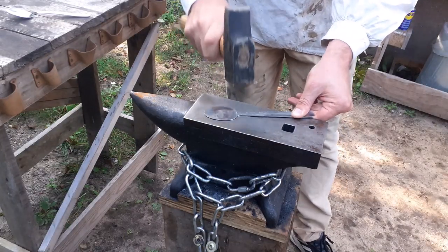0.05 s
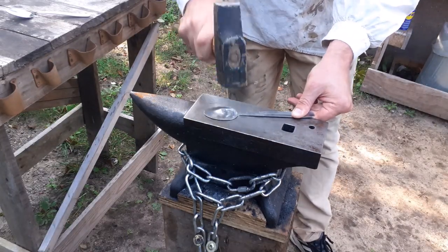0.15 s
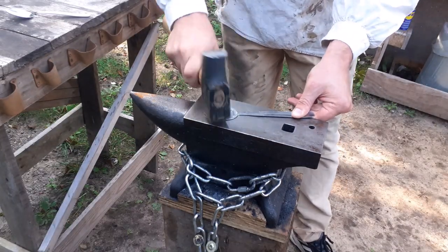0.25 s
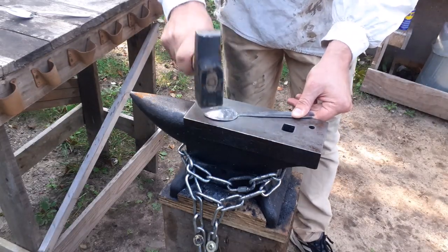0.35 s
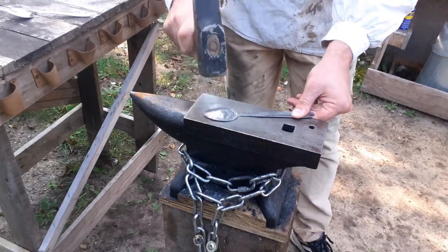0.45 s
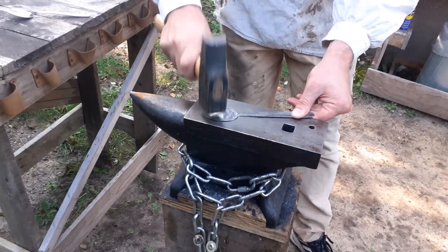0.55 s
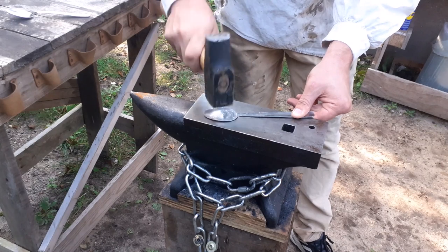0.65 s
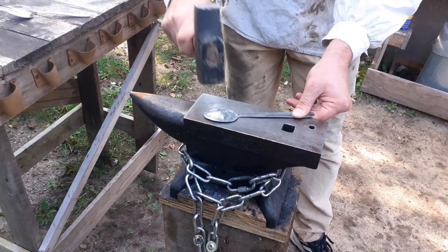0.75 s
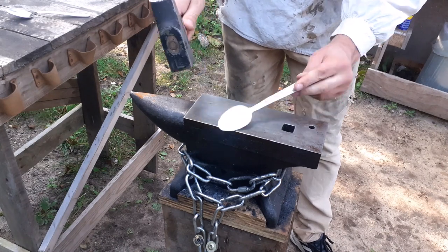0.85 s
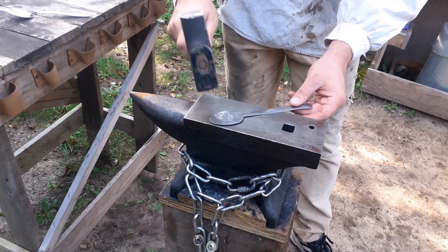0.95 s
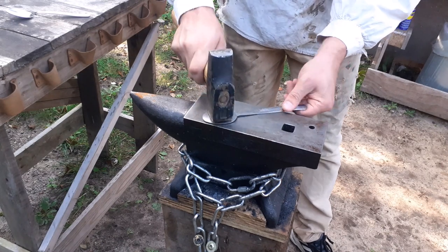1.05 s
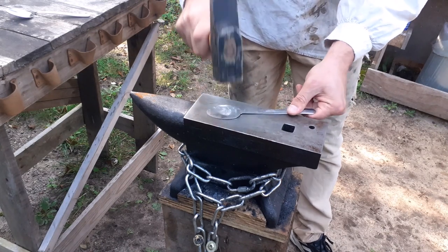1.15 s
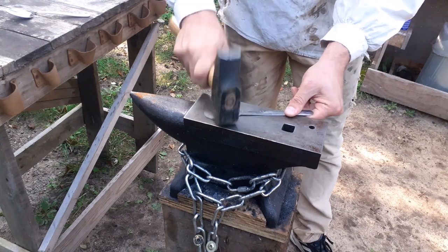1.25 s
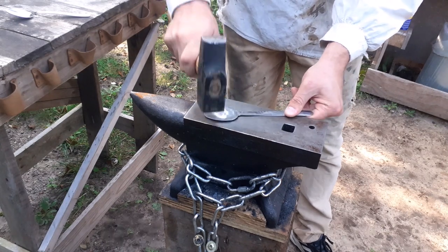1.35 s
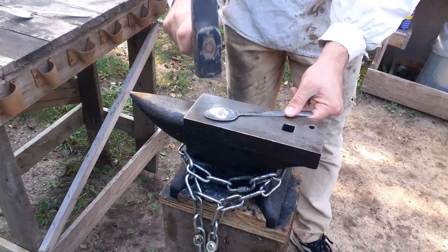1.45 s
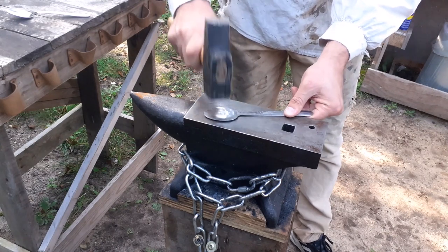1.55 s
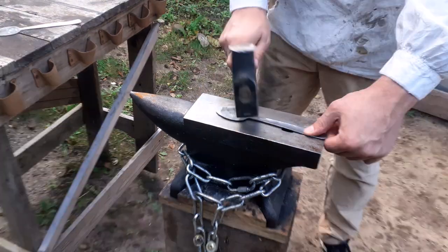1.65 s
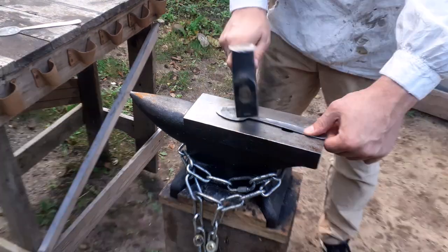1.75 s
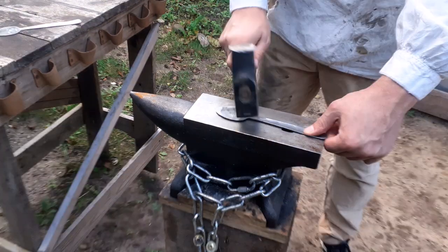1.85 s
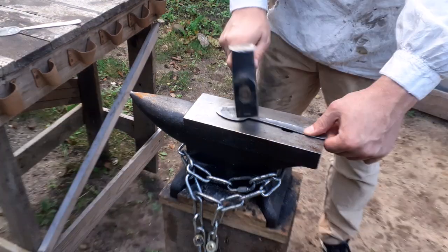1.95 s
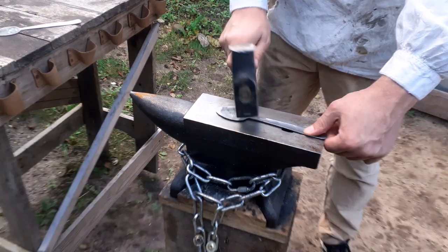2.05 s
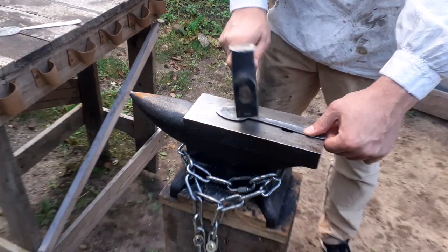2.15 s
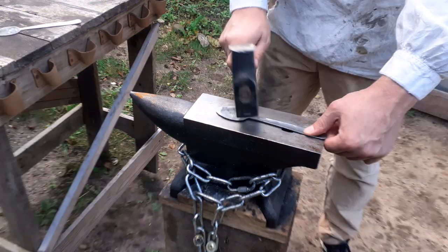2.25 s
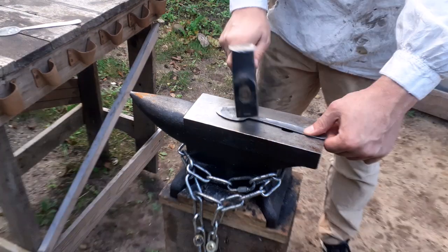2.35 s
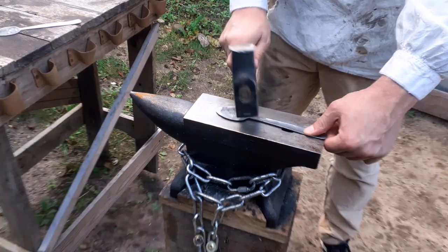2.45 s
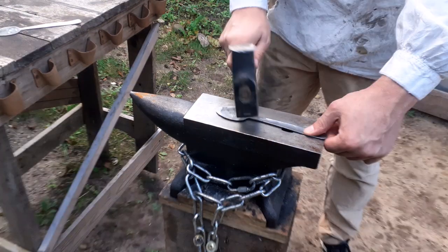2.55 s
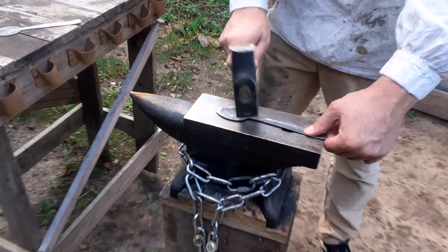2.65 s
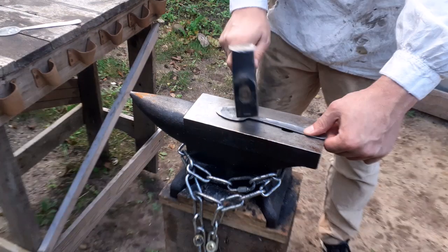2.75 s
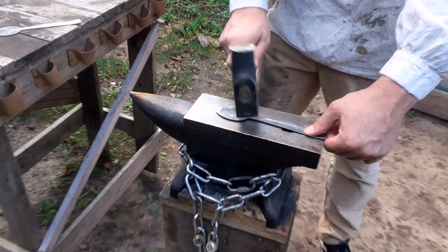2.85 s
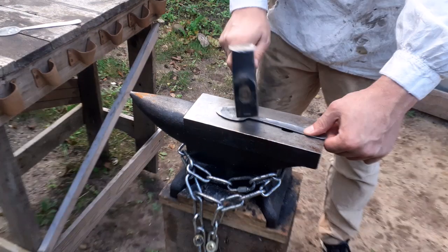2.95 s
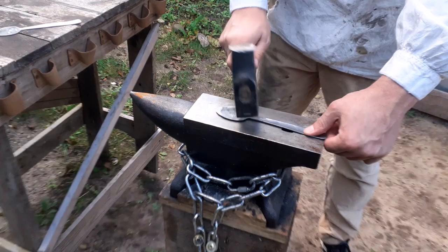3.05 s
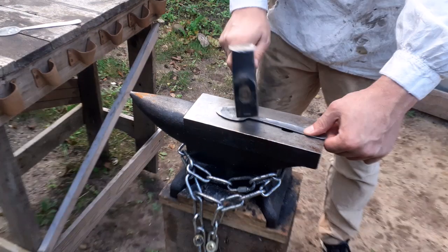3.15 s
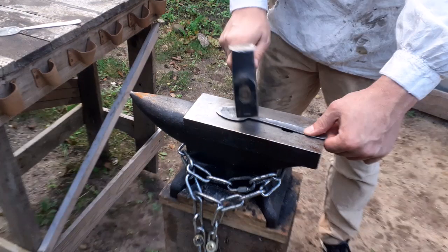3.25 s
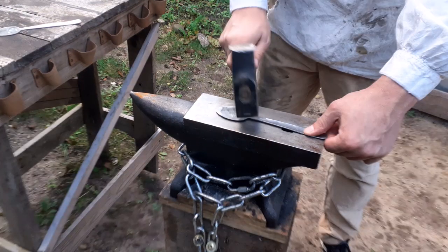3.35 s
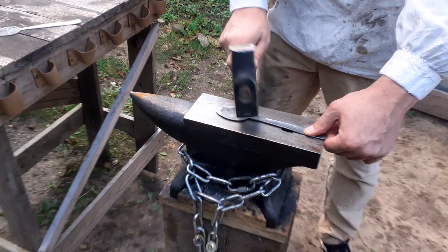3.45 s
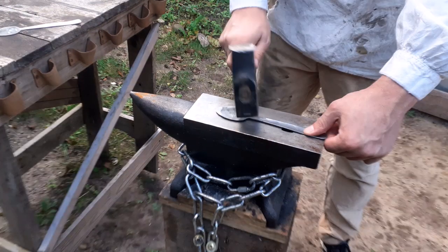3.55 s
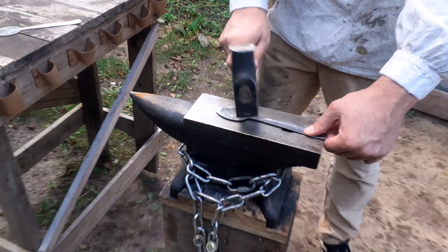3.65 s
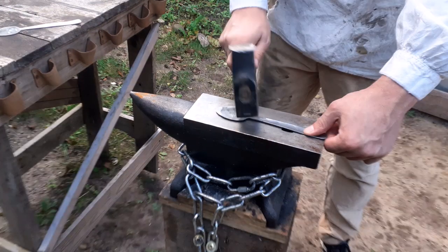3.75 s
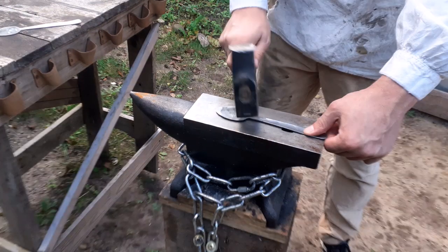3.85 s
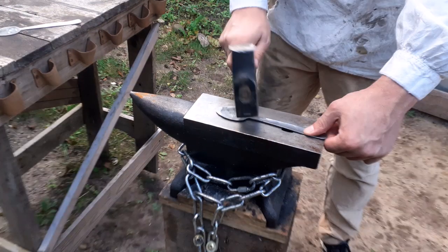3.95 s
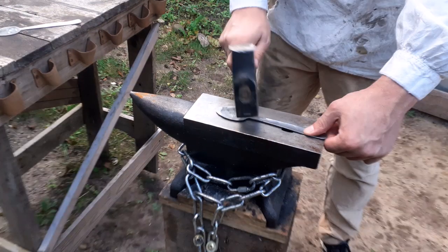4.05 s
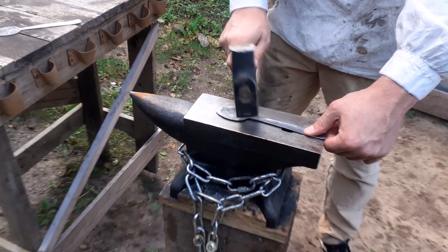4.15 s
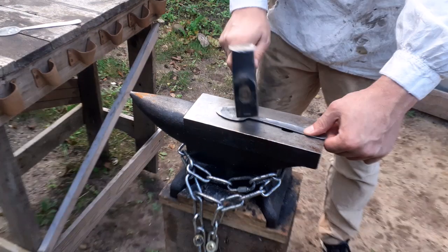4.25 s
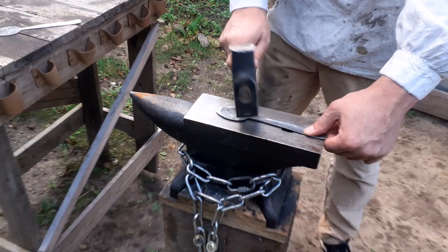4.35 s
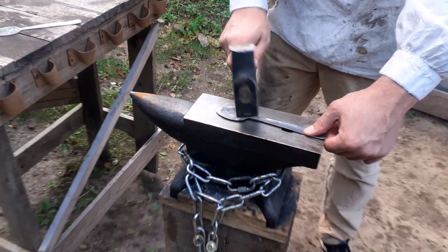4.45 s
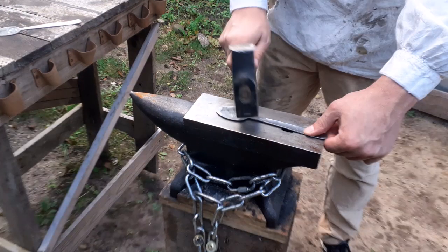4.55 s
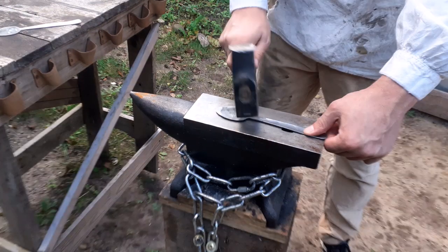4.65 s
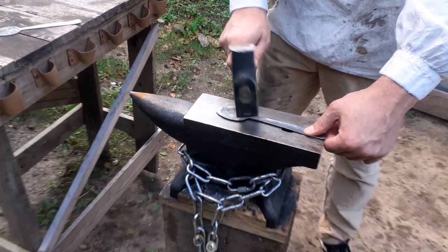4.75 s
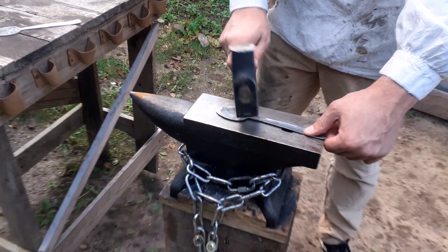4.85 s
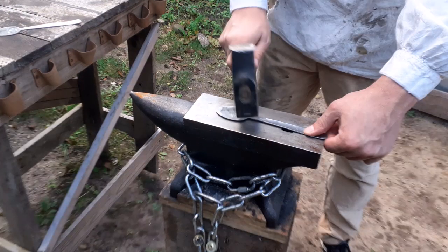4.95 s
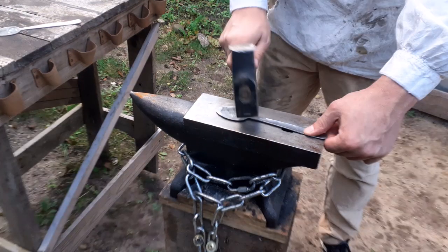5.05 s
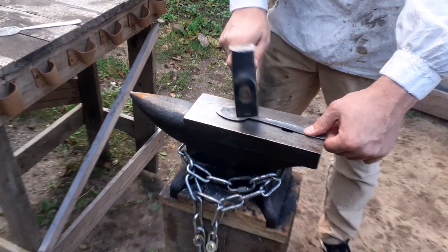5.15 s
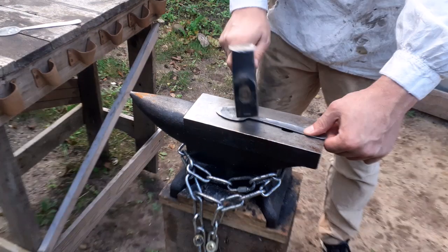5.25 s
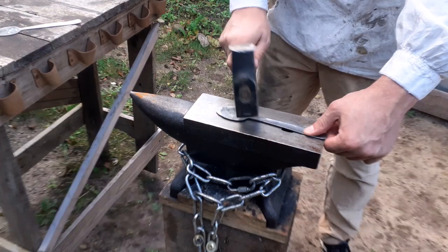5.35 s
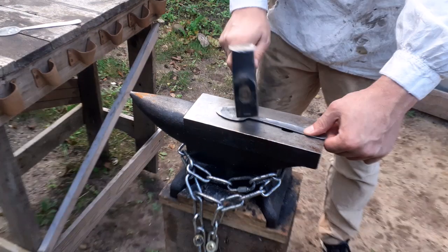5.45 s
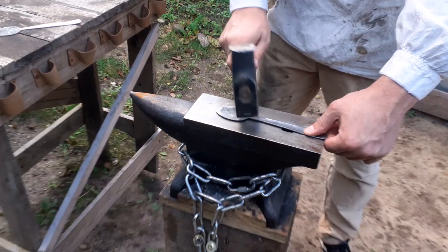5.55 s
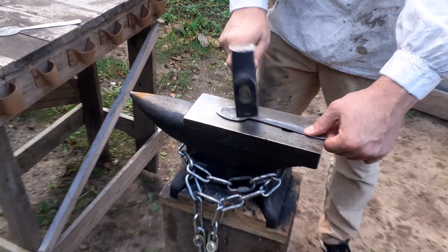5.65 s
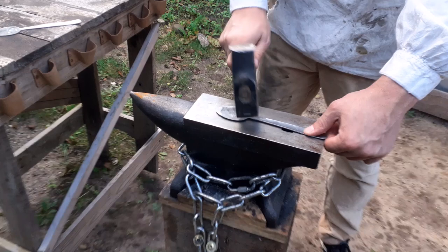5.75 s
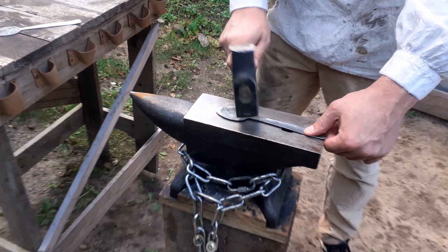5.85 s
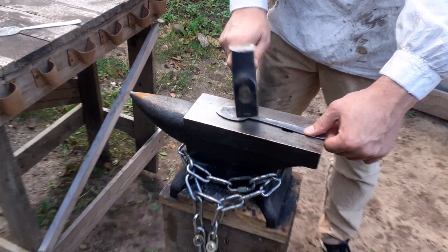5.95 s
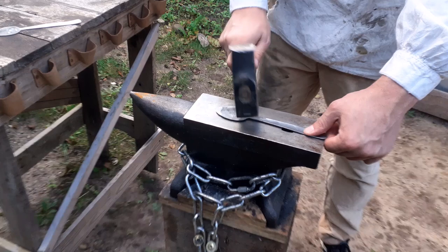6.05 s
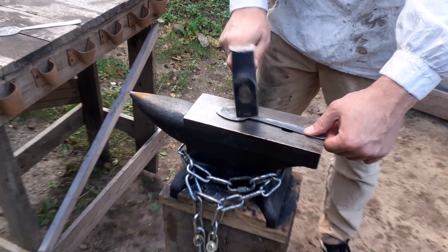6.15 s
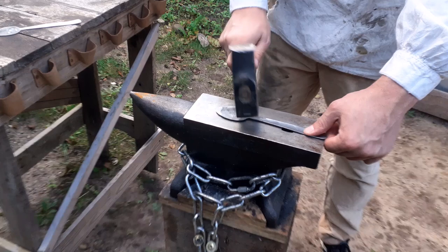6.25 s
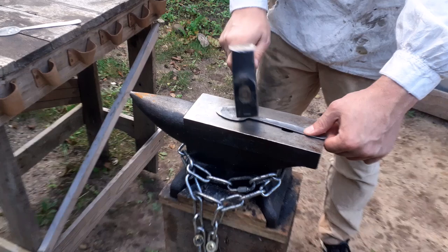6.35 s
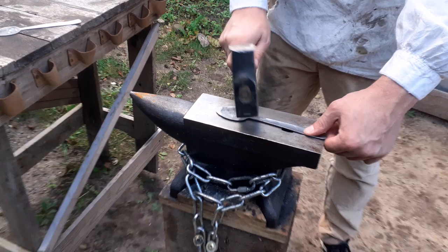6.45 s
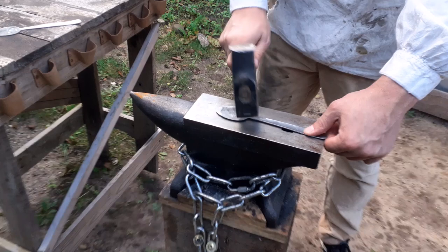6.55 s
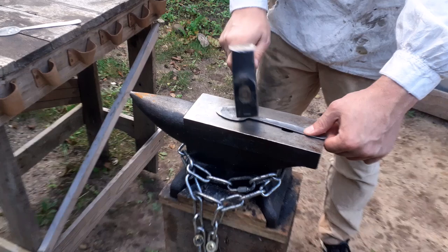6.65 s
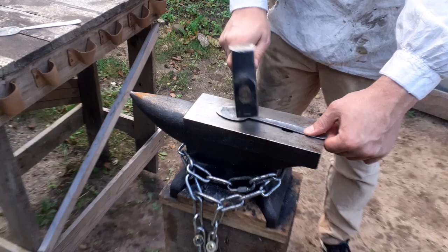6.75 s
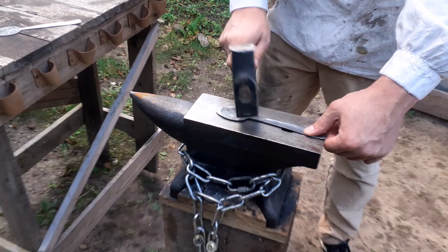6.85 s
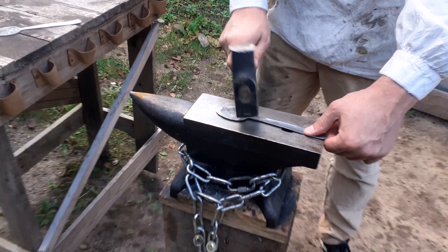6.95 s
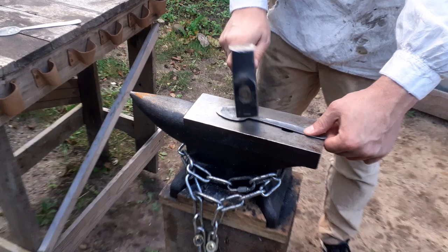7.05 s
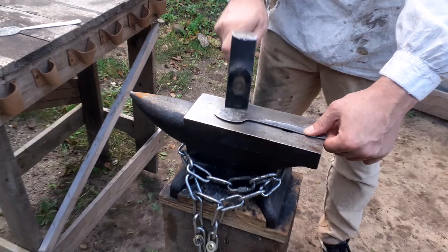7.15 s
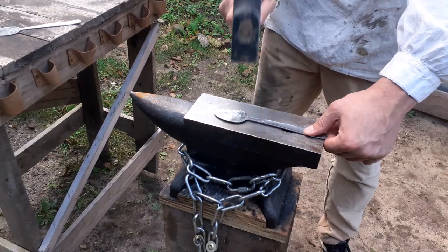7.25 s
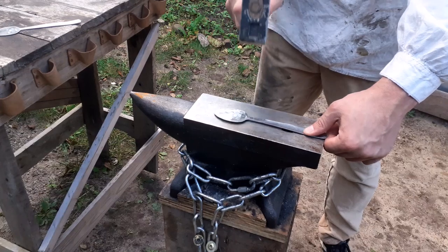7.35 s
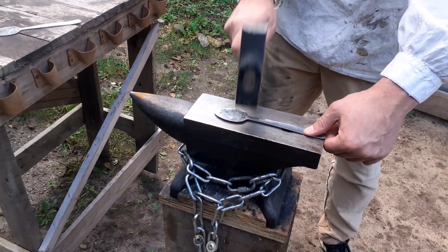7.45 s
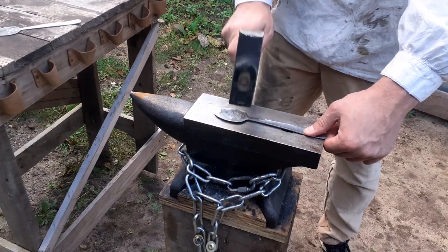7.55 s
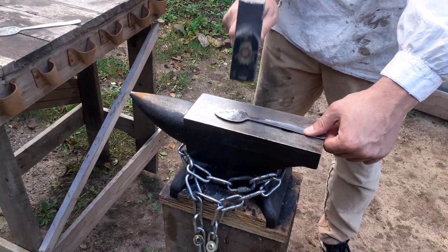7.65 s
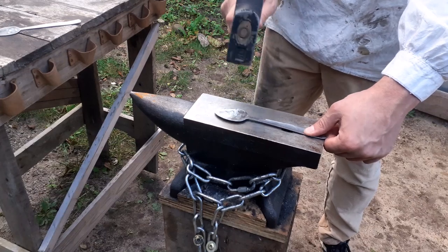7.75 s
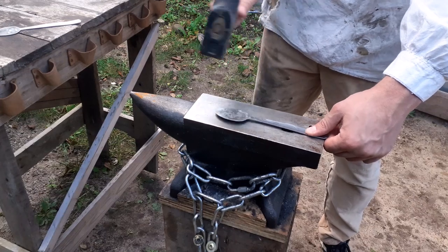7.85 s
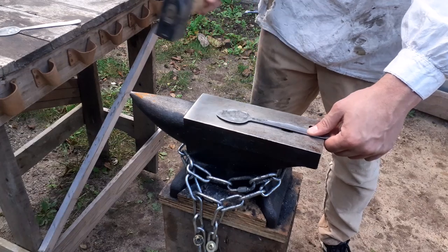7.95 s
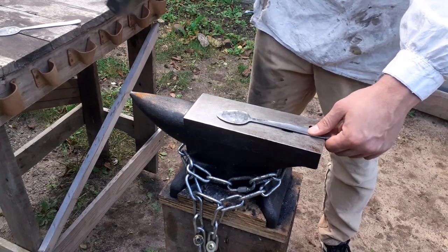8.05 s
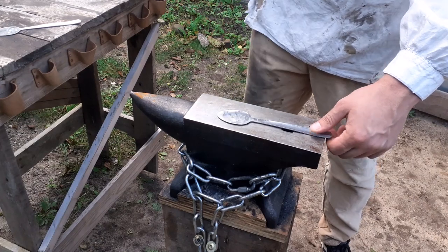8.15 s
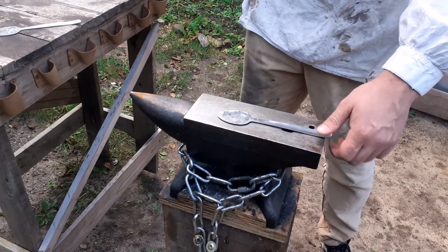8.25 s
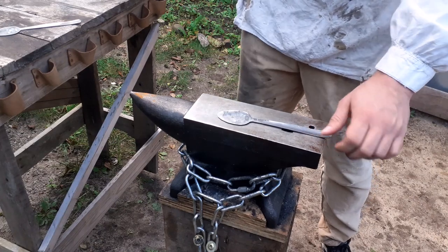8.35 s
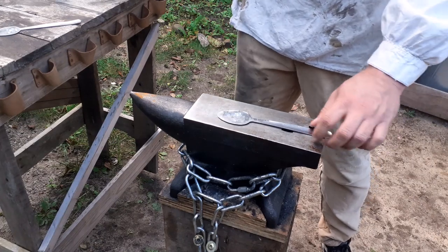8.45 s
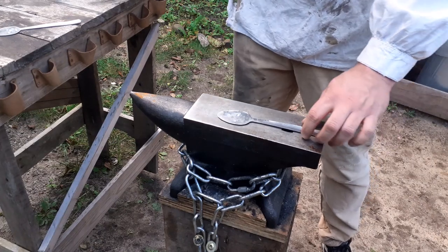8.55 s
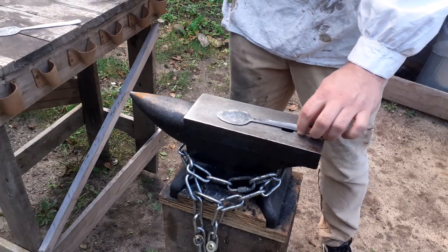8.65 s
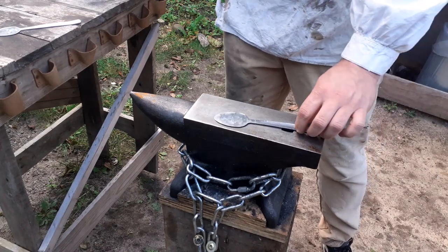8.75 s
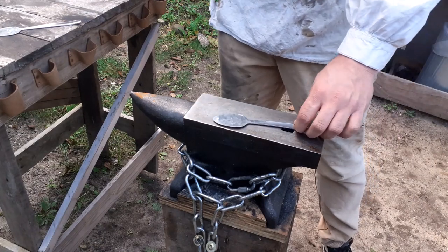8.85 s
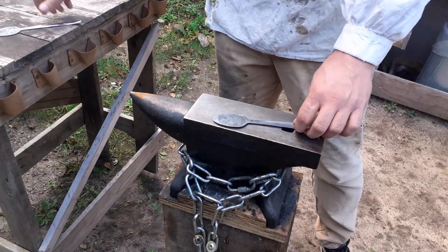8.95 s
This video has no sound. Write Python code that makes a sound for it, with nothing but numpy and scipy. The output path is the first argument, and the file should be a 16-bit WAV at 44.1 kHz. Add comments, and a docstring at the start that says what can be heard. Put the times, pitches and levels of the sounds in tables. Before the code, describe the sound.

Outdoors and close by, a hammer beats a metal spoon on an anvil in rapid, high, fast-forward bursts, ending with one real-time clank.

```python
"""Spoon flattened on an anvil

A hand hammer flattens a metal spoon on a chained steel anvil in a yard, heard from close by. The first
seven seconds run four times fast: in each run, blows come twelve a second, short and high. Between runs the
spoon scrapes and clinks and tools knock on a wooden bench; at natural pace one last blow, spoon bounces,
bench knocks. Decaying modes make the rings, shaped noise the crushes, scrapes, chain and yard."""
import sys
import numpy as np
from scipy import signal
from scipy.fft import rfft, irfft
from scipy.io import wavfile
from scipy.ndimage import uniform_filter1d

SR = 44100
rng = np.random.default_rng(int(sys.argv[2]) if len(sys.argv) > 2 else 0)


def bounce(signal):
    """Save signal as a 16-bit WAV file at the path given by the first command-line argument."""
    frames = np.transpose(np.atleast_2d(signal))
    limited = np.clip(frames, -1, 1)
    pcm = np.round(limited * 32767).astype(np.int16)
    wavfile.write(sys.argv[1], SR, pcm)


N = 396900

FAST, FAST_END_S = 4, 7.16  # the scene runs this many times faster than life until this moment
TOP_HZ = 16500  # top of the microphone's range
ANVIL_PAN_DB = -1.5  # left over right: the anvil stands a little to the right
MIRROR = np.array([[1], [-1]])  # left and right in opposite sense

# Bands in which chain links, and metal at natural pace, sound. Each row: low edge in Hz, high edge in Hz,
# level in dB.
LINKS = [(2000, 16000, -9), (4450, 5300, 0), (7500, 8400, -8), (11600, 13200, -3)]


def undb(db):
    """Amplitude factor of a level in dB."""
    return 10 ** (np.asarray(db) / 20)


def pace(s):
    """How many times faster than life the scene runs at this moment."""
    return FAST if s < FAST_END_S else 1


def add(track, s, sound):
    """Mix a sound in at a time in seconds."""
    i = int(s * SR)
    n = min(sound.shape[-1], N - i)
    track[..., i:i + n] += sound[..., :n]


def fade(t, t60):
    """Exponential decay that loses 60 dB in t60 seconds."""
    return np.exp(-np.log(1000) * t / max(t60, 1e-3))


def surge(t, peak_s):
    """Swell to a top of 1 at peak_s, then a slower fall."""
    return t / peak_s * np.exp(1 - t / peak_s)


def sides(db):
    """Left and right gains that differ by this many dB."""
    return undb(np.array([[db], [-db]]) / 2)


def pair(likeness):
    """Left and right noise with this correlation."""
    mid, side = rng.standard_normal((2, N))
    c = np.clip(likeness, -1, 1)
    return np.sqrt((1 + c) / 2) * mid + np.sqrt((1 - c) / 2) * side * MIRROR


def band(x, lo_hz, hi_hz):
    """Band-pass that roughly keeps the rms of white noise."""
    sos = signal.butter(2, [lo_hz, min(hi_hz, .45 * SR)], "bandpass", fs=SR, output="sos")
    return signal.sosfilt(sos, x) * np.sqrt(SR / 2 / (hi_hz - lo_hz))


def ring(modes, speed, damp, scatter_db, spread, rough, drift=0.022):
    """One strike on a set of modes; each strike point weights them anew, loose contact makes them waver."""
    t = np.arange(int(.35 * SR / speed)) / SR * speed  # natural time
    out = np.zeros((2, len(t)))
    knots = np.arange(0, .36, .004)
    draws = rng.standard_normal((len(modes), 3))
    for (hz, db, t60), (weight, detune, lag) in zip(modes, draws):
        steps = rough * rng.standard_normal(len(knots)) * (knots > 0)
        waver = np.interp(t, knots, np.cumsum(steps))
        if hz * speed < TOP_HZ:
            phase = 2 * np.pi * hz * (1 + drift * detune) * t + waver + spread * lag * MIRROR / 2
            # most energy leaves at once, a weaker part lingers
            decay = fade(t, t60 * damp) + undb(-7.5) * fade(t, t60)
            onset = np.minimum(t * hz * 2, 1)
            out += undb(db + scatter_db * weight) * decay * np.sin(phase) * onset
    return out


def tilted(modes, db_per_octave):
    """A harder contact drives the upper modes more."""
    return [(hz, db + db_per_octave * np.log2(hz / 400), t60) for hz, db, t60 in modes]


def grit(size):
    """Level that jumps about within this many samples, as metal catches and slips."""
    return undb(2.8 * uniform_filter1d(rng.standard_normal(N), size=size) * np.sqrt(size))


def hammer():
    """Steel on steel: dense crush, short clank, thud, rebound, noise tail from chain and yard, stand ring."""
    # Hammer blows. Each row: start in seconds, level in dB, clank in dB relative to the blow, clank pitch
    # in Hz as heard (it varies from blow to blow), thud in dB relative to the blow.
    blows = [(0.0014, -19, 3.5, 1180, -7), (0.0772, -14, -8, 3000, -11.5), (0.1597, -12, 2.5, 1270, -15.5),
             (0.238, -12.5, 4, 1490, -19.5), (0.3137, -15.5, 3.5, 1630, -19.5),
             (0.3909, -11.5, 5.5, 1350, -9.5), (0.4649, -13, -1.5, 2300, -21),
             (0.5426, -11.5, -5, 2720, -14.5), (0.619, -12.5, 3.5, 1260, -14),
             (0.6958, -11.5, -5, 1630, -23), (0.7742, -9.5, 1, 1415, -13.5), (1.2352, -13, 1.5, 1340, -12),
             (1.3154, -13, -19.5, 1490, -20.5), (1.3926, -9.5, 0, 1390, -14),
             (1.4661, -14.5, 1.5, 1420, -15), (1.5451, -16.5, -19, 1590, -12), (1.6221, -10, 0, 1510, -17),
             (1.698, -9, -8, 1210, -13.5), (1.7756, -11, -7, 1500, -17.5), (1.8516, -13, -6, 4900, -12.5),
             (3.5975, -12, 2, 1380, -15), (3.6789, -11, 1.5, 1980, -18.5), (3.7595, -10, -1.5, 1320, -21.5),
             (3.8433, -10, 0, 1360, -15), (3.926, -10.5, -7, 4940, -14.5), (4.011, -12.5, -3, 1900, -14.5),
             (4.0939, -12.5, 0.5, 720, -14), (4.1782, -9.5, -4.5, 1950, -16),
             (4.2641, -13.5, -4, 5400, -11.5), (4.347, -9, -12, 3230, -16), (4.4305, -9, 3, 1430, -12.5),
             (4.5144, -12, -5, 1340, -12), (4.5983, -11.5, -8, 1360, -15.5), (4.6828, -9, -4, 1280, -19.5),
             (4.7667, -9.5, -2.5, 3070, -14), (4.8468, -10.5, -7.5, 2120, -12),
             (4.933, -10, -9, 1890, -19.5), (5.017, -11.5, -14.5, 1690, -13),
             (5.0994, -13.5, -7.5, 1690, -18), (5.1827, -13, -7, 1830, -18.5),
             (5.2692, -14.5, -5, 1580, -20), (5.670, -17, -28, 1400, -19.5),
             (5.7618, -10.5, -4.5, 1300, -24), (5.8481, -9.5, -4.5, 1770, -15.5),
             (5.934, -9.5, -2.5, 1640, -15), (6.0183, -11, -13, 1660, -8), (6.1049, -12.5, 1.5, 4530, -12),
             (6.1877, -7.5, -1.5, 2990, -18), (6.2658, -11, 0, 3730, -11.5),
             (6.5272, -12.5, 3.5, 1980, -15.5), (6.6419, -10, -4.5, 1350, -15.5),
             (7.1328, -13, -21.5, 1410, -14), (7.5265, -8.5, -3.5, 370, -10.5)]
    # Noise bands of a blow. Each row: low edge in Hz, high edge in Hz, level in dB, tail in dB relative to
    # the band, t60 of the tail's main part in seconds at natural pace.
    blow_bands = [(29.3, 163, -11, -30, 0.27), (201, 924, -1, -6.5, 0.12), (780, 1990, 11.5, -18, 0.13),
                  (1880, 4930, -2.5, -15.5, 0.11), (4970, 8630, -3.5, -14.5, 0.075),
                  (9050, 15200, -4, -10, 0.083), (1190, 1700, -46.5, -10, 0.79)]
    # Anvil stand modes. Each row: Hz at natural pace, level in dB, t60 of the lingering part in seconds
    # at natural pace.
    stand_modes = [(345, -21.5, 0.55), (420, -24, 0.51)]
    # Deep thump under the blows. Each row: time in seconds, level in dB.
    thump_course = [(0, -8.5), (4.4, -6.5), (4.9, 5), (6.3, -2.5), (6.55, -8.5), (7.2, 7)]

    # times at natural pace; the crush bites at once and is soon over
    crush_rise_s, crush_t60_s = .0016, .027
    rebound_s, rebound_db = 0.013, -10  # the hammer face touches down once more
    clank_peak_s, thud_peak_s = .003, 0.0072
    thud_hz, thud_tone_db = 442, 1  # centre of the loose pitch of the stump's thud, as heard
    side_lag = 1  # radians that each side leads or trails

    envelopes, rings = np.zeros((len(blow_bands), 2, N)), np.zeros((2, N))
    draws = rng.standard_normal((len(blows), 5))
    for (s, db, clank_db, clank_hz, thud_db), (side, late, hard, heavy, deep) in zip(blows, draws):
        natural = s > FAST_END_S
        heard_t = np.arange(int(.4 * SR / pace(s))) / SR
        t = heard_t * pace(s)
        # the faces chatter: several small impacts within the crush
        chatter = undb(4.5 * np.interp(t, np.arange(16) * .0009, rng.standard_normal(16)))
        crush = np.minimum(t / crush_rise_s, 1) * fade(t, crush_t60_s) * chatter
        since = t - rebound_s * (1 + 0.12 * late)
        rebound = undb(rebound_db + 5 * hard) * fade(np.abs(since), .006) * (since > 0)
        # the loose spoon shivers: the tail dies away raggedly
        shiver = undb(2 * np.interp(t, np.arange(40) * .012, rng.standard_normal(40)))
        thump_db = np.interp(s, *np.transpose(thump_course)) + 2 * heavy
        mid_db = -10 if natural else -17.5  # noise around the clank
        gain = undb(db) * sides(ANVIL_PAN_DB + 2.2 * side)

        own_levels_db = (thump_db, thud_db, mid_db, 0, 0, 0, 0)
        for envelope, (_, _, band_db, tail_db, t60), own_db in zip(envelopes, blow_bands, own_levels_db):
            # each blow leaves its own colour of rattle; the last leaves less: the spoon jumps clear
            rattle_db = tail_db - 10 * natural + 3.5 * rng.standard_normal()
            tail_decay = fade(t, t60) + undb(-13.5) * fade(t, 5 * t60)
            tail = undb(rattle_db) * tail_decay * np.minimum(t / rebound_s, 1) * shiver
            add(envelope, s, gain * undb(band_db + own_db) * (crush + rebound + tail))

        lag = side_lag * np.sign(side) * MIRROR
        clank = surge(t, clank_peak_s) * np.sin(2 * np.pi * clank_hz * heard_t + lag)
        add(rings, s, gain * undb(clank_db) * clank)
        thud_tone = np.sin(2 * np.pi * thud_hz * 1.325 ** deep * heard_t + lag)
        add(rings, s, gain * undb(thud_db + thud_tone_db) * surge(t, thud_peak_s) * thud_tone)
        stand = ring(stand_modes, pace(s), .3, scatter_db=2.5, spread=1.2, rough=1.2)
        add(rings, s, gain * undb(-8 * natural) * stand)  # the stand rings fainter at natural pace

    noises = (band(pair(0) * e, lo, hi) for e, (lo, hi, _, _, _) in zip(envelopes, blow_bands))
    return rings + sum(noises)


def spoon():
    """Clinks start sharply and ring the spoon; scrapes swell and stop as gritty noise."""
    # Spoon clinks on the steel. Each row: start in seconds, level in dB, ring in dB relative to the clink.
    clinks = [(0.9149, -23, -20), (1.0693, -13.5, -18), (1.0825, -16, -15), (1.0912, -19.5, -14),
              (1.1004, -17, -12), (1.1148, -20, -12), (1.1233, -26, -14), (1.924, -34.5, -13),
              (3.249, -27.5, -3.5), (3.3403, -22, -10.5), (3.4138, -34.5, -23), (3.492, -31.5, -31),
              (5.61, -26, -24), (5.6233, -25, -30), (6.345, -24, -4), (7.198, -32.5, -8),
              (7.53, -24.5, 2.5), (7.5572, -16.5, -18.5), (7.5944, -23.5, -0.5), (7.644, -46, 4),
              (7.953, -37, -13)]
    # Spoon slides over the face. Each row: middle in seconds, length in seconds, level in dB.
    scrapes = [(0.887, 0.075, -48.5), (0.94, 0.06, -47), (1.003, 0.031, -34), (1.024, 0.013, -47),
               (1.049, 0.049, -41.5), (1.137, 0.19, -49), (2.829, 0.1, -34.5), (3.286, 0.046, -35.5),
               (3.356, 0.022, -39.5), (3.374, 0.021, -43), (3.4, 0.04, -41.5), (3.446, 0.031, -41),
               (3.466, 0.022, -42), (3.483, 0.032, -39), (3.507, 0.022, -38.5), (4.157, 0.059, -44),
               (5.347, 0.071, -40.5), (5.547, 0.04, -33), (5.647, 0.036, -36), (5.66, 0.018, -38),
               (6.317, 0.077, -40.5), (6.398, 0.072, -43.5)]
    # Spoon modes, flat on the steel, then turned over in the fingers. Each row: Hz at natural pace,
    # level in dB, t60 of the lingering part in seconds at natural pace.
    flat_modes = [(1710, -7, 0.028), (4430, 3, 0.041), (4930, 6.5, 0.049), (5070, -2.5, 0.077),
                  (7670, 0.5, 0.063), (12200, -1, 0.045)]
    lifted_modes = [(2197, 17.5, 0.13), (3780, 13, 0.11)]
    lifted_start_s, lifted_end_s = 3.24, 3.52

    high, low, rings = np.zeros(N), np.zeros(N), np.zeros((2, N))
    t = np.arange(int(.15 * SR)) / SR
    for s, db, ring_db in clinks:
        t60, low_db = (.035, -21) if s > FAST_END_S else (.022, -9)  # noise decay as heard, low share
        modes = lifted_modes if lifted_start_s < s < lifted_end_s else flat_modes
        add(high, s, undb(db) * fade(t, t60) * np.minimum(t * pace(s) / 0.0013, 1))
        add(low, s, undb(db + low_db) * fade(t, t60))
        rung = ring(modes, pace(s), .5, scatter_db=2.5, spread=1.6, rough=1.2, drift=.004)
        add(rings, s, undb(db + ring_db) * rung)
    for s, length, db in scrapes:
        swell = np.hanning(int(length * SR))
        add(high, s - length / 2, undb(db) * swell)
        add(low, s - length / 2, undb(db - 9) * swell)

    # while the spoon is lifted, a band of treble colours its noise
    sample = np.arange(N)
    lifted = (sample > lifted_start_s * SR) & (sample < lifted_end_s * SR)
    sheen = undb(-3) * band(pair(0) * high * lifted, 10560, 12220)

    # at natural pace the metal's own bands are heard
    hiss = pair(0) * high * grit(40)
    own_bands = sum(undb(db) * band(hiss, lo, hi) for lo, hi, db in LINKS)
    # four times faster they blur, each stretch of treble catching on its own
    edges = np.geomspace(2800, TOP_HZ, 5)
    patchy = np.zeros((2, N))
    for lo, hi in zip(edges, edges[1:]):
        patchy += band(hiss * grit(150), lo, hi) * np.sqrt((hi - lo) / TOP_HZ)
    cut = int(FAST_END_S * SR)
    bright = np.hstack([patchy[:, :cut], own_bands[:, cut:]])
    body = band(pair(0.059) * low * grit(40), 130, 2200)
    return rings + sheen + bright + body


def bench():
    """Tools knock on wood: modes per knock plus a short hard edge of noise."""
    # Knocks on the bench. Each row: start in seconds, level in dB, hardness as brightness in dB per octave.
    knocks = [(2.061, -22, 0.5), (2.0676, -17.5, -7), (2.086, -14, 1), (2.094, -20, 0), (2.803, -26.5, 6),
              (2.821, -19, 4.5), (2.832, -23, 5.5), (2.848, -25.5, 4), (3.193, -35, 2), (8.611, -9.5, -1.5),
              (8.628, -14.5, 0.5), (8.7271, -6.5, 3), (8.7406, -13.5, 2), (8.768, -14.5, -0.5),
              (8.853, -20, 3.5), (8.861, -20.5, -2), (8.95, -29.5, 2.5), (8.962, -31, -5)]
    # Bench modes. Each row: Hz at natural pace, level in dB, t60 of the lingering part in seconds
    # at natural pace.
    wood_modes = [(189.5, -8, 0.39), (333.6, -2.5, 0.41), (396.7, 11.5, 0.15), (738, 0, 0.17),
                  (866, -0.5, 0.08), (1183, -7, 0.08), (1560, -16, 0.07)]
    push_s, drop_db = 0.0092, -4.5  # push at natural pace

    out, edge = np.zeros((2, N)), np.zeros((2, N))
    for s, db, tilt_db in knocks:
        edge_db = -23 + 5 * tilt_db  # the noisy edge grows with hardness
        gain = undb(db) * sides(-1.1)
        modes = tilted(wood_modes, tilt_db)
        wood = ring(modes, pace(s), 0.58, scatter_db=1.5, spread=.8, rough=.9, drift=.006)
        # the ring builds while the tool presses, then drops as it settles
        pushes = np.arange(wood.shape[1]) / SR * pace(s) / push_s
        start = np.clip(.2 * tilt_db, .3, 1)
        push = np.interp(pushes, [0, .7, 1, 1.2], [start, 1, 1, undb(drop_db)])
        add(out, s, gain * undb(-12) * wood * push)
        edge_t = np.arange(int(.1 * SR)) / SR * pace(s)
        add(edge, s, gain * undb(edge_db) * fade(edge_t, 0.088))
    hiss = pair(-0.36) * edge
    cut = int(FAST_END_S * SR)
    fast, natural = band(hiss, 3230, 5500), band(hiss, 750, 1500)
    return out + np.hstack([fast[:, :cut], natural[:, cut:]])


def chain():
    """Links tick against each other in dense uneven grains that die away; later one link swings on alone."""
    # Jangles of the chain round the anvil. Each row: start in seconds, level in dB, t60 in seconds.
    jangles = [(7.166, -47, 0.34), (7.535, -35.5, 0.3258)]
    # One swinging link ticks, then fainter. Each row: start in seconds, level in dB.
    lone_ticks = [(7.955, -39), (8.2, -67), (8.25, -72)]
    # Modes of that link. Each row: Hz, level in dB, t60 of the lingering part in seconds.
    link_modes = [(3910, -3.1, 0.042), (4660, 0.35, 0.089)]

    envelope, lone = np.zeros(N), np.zeros((2, N))
    t = np.arange(SR // 2) / SR
    for s, db, t60 in jangles:
        add(envelope, s, undb(db) * fade(t, t60) * np.minimum(t / 0.016, 1))
    for s, db in lone_ticks:
        tick = ring(link_modes, pace(s), .5, scatter_db=1.5, spread=1.2, rough=1.4, drift=.006)
        add(lone, s, undb(db) * tick)
    # about 200 ticks a second, each dying away over 2 ms
    ticks = (rng.random(N) < 200 / SR) * undb(2.5 * rng.exponential(size=N))
    grains = 1.1 + signal.lfilter([1], [1, -np.exp(-1 / (.002 * SR))], ticks)
    jangle = sum(undb(db) * band(pair(0) * envelope * grains, lo, hi) for lo, hi, db in LINKS)
    return lone + jangle


def drone():
    """Faint low tones, perhaps a far engine, that swell, glide a little and fade."""
    # Each row: start pitch in Hz, glide in Hz per second, start in seconds, end in seconds, rms level in dB.
    tones = [(264, 0, .3, 3.3, -66), (490, 0, 2.2, 3.5, -66), (450, -20, 6.3, 6.9, -64),
             (290, 60, 6.75, 7.3, -62)]
    out = np.zeros(N)
    for hz, glide, start, end, db in tones:
        t = np.arange(int((end - start) * SR)) / SR
        wobble = np.cumsum(0.012 * rng.standard_normal(len(t)))
        swell = np.sqrt(2 * np.hanning(len(t)))
        tone = np.sin(2 * np.pi * (hz + glide * t / 2) * t + wobble)
        add(out, start, undb(db) * swell * tone)
    return out


def yard():
    """Noise shaped as distant traffic and leaves, and as tails of blow and knocks; bass more alike in stereo."""
    # Colour of the background at fast and at natural pace. Each row: Hz as heard, relative level in dB per Hz.
    fast_colour = [(60, -50.5), (177, -20), (258, -6), (393, -9), (521, -7.5), (796, -18), (1300, -4.5),
                   (1690, -12), (3260, -13.5), (15500, -32)]
    natural_colour = [(35, -45), (60, -8.5), (114, -11.5), (209, -18.5), (340, -10), (814, -18.5),
                      (1170, -20), (3200, -33.5), (16500, -45)]
    # Course of the background's level, with the echoing tails after the last fast blow and the bench
    # knocks. Each row: time in seconds, level in dB.
    level_course = [(0, -60.5), (1.9, -61), (2.0, -63), (2.35, -54.5), (3.3, -53), (3.55, -63.5),
                    (6.8, -62.5), (7.12, -55.5), (7.17, -49), (7.45, -64.5), (7.9, -65), (8.55, -66),
                    (8.75, -46.5), (9, -48)]

    hz = np.fft.rfftfreq(N, 1 / SR) + 1
    mid, side = rfft(rng.standard_normal((2, N)))
    # left and right are independent above 2480 Hz
    noise = mid + np.clip(hz / 2480, .45, 1) * side * MIRROR
    airs = []
    for colour in (fast_colour, natural_colour):
        colour_hz, colour_db = np.transpose(colour)
        shape = undb(np.interp(np.log(hz), np.log(colour_hz), colour_db))
        air = irfft(noise * shape, N)
        airs.append(air / air.std())
    t = np.arange(N) / SR
    return np.where(t < FAST_END_S, *airs) * undb(np.interp(t, *np.transpose(level_course)))


def scene():
    """All sources, each at its place left to right."""
    at_anvil = sides(ANVIL_PAN_DB) * (spoon() + chain())
    return hammer() + at_anvil + bench() + drone() + sides(-2.0) * yard()


def record(dry):
    """The microphone rounds the loudest peaks and cuts the top."""
    rounded = np.tanh(0.73 * dry) / 0.86
    return signal.sosfilt(signal.ellip(8, .2, 70, TOP_HZ, fs=SR, output="sos"), rounded)


dry = scene()
out = record(dry)
bounce(out)
```